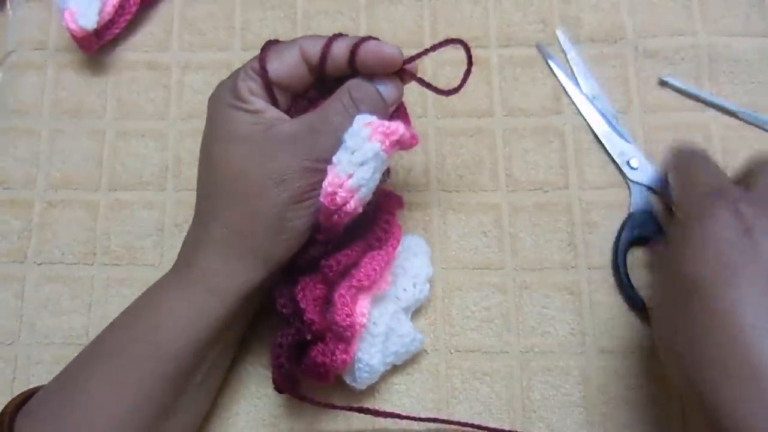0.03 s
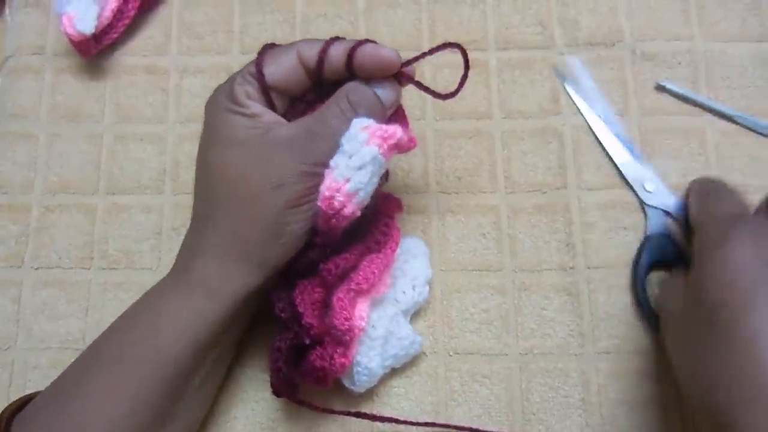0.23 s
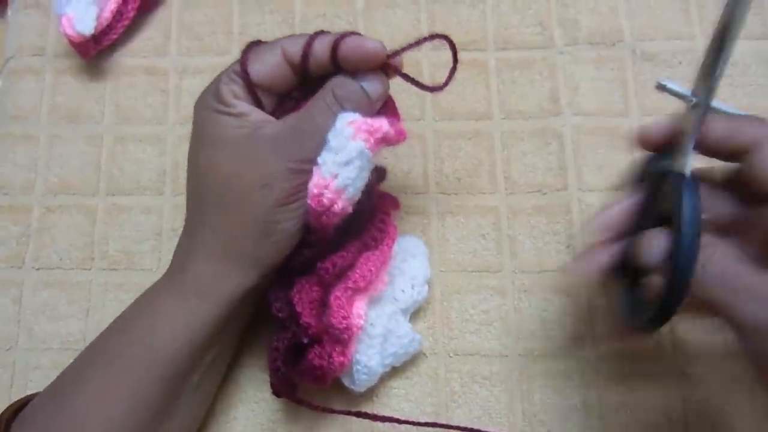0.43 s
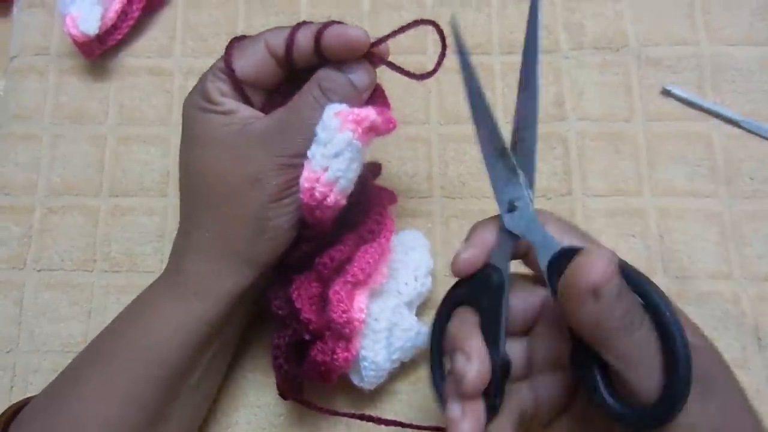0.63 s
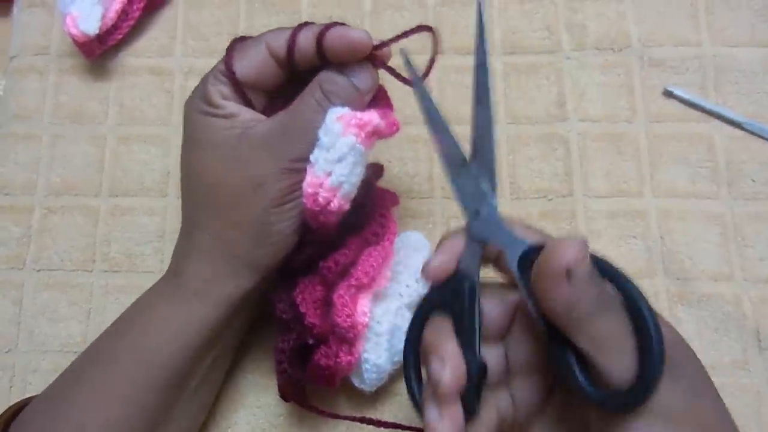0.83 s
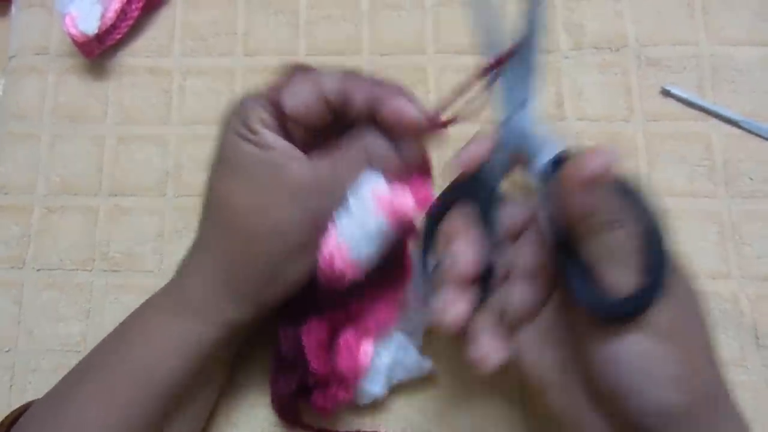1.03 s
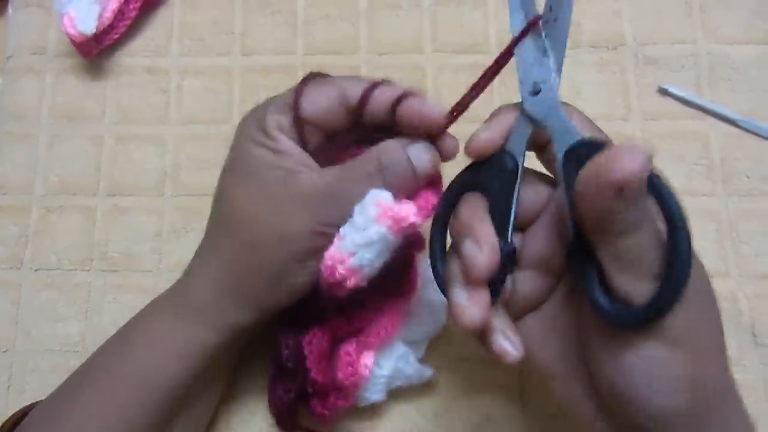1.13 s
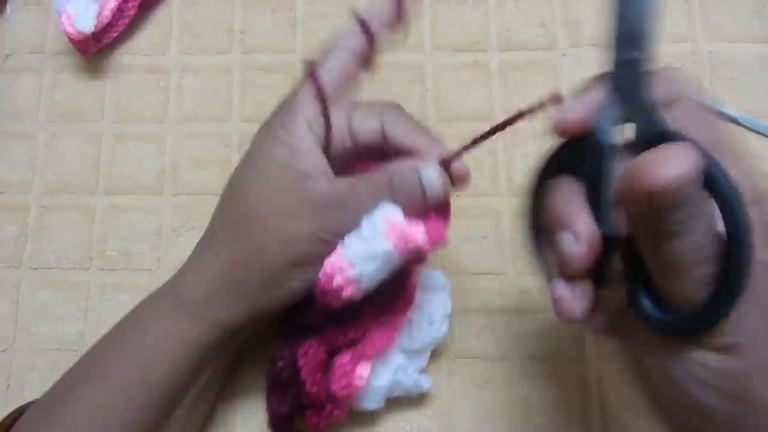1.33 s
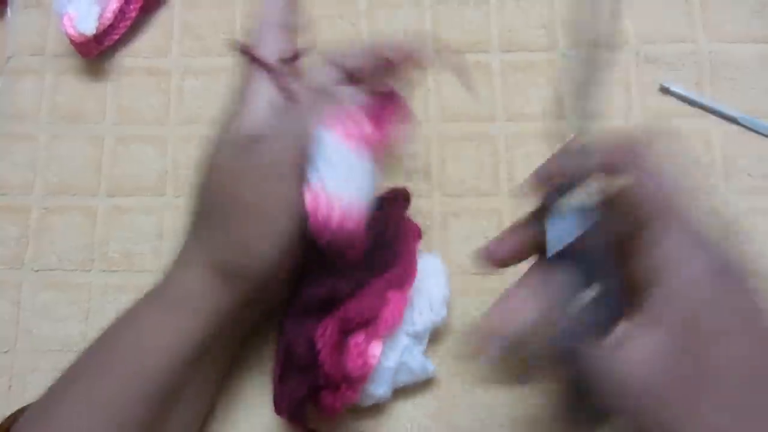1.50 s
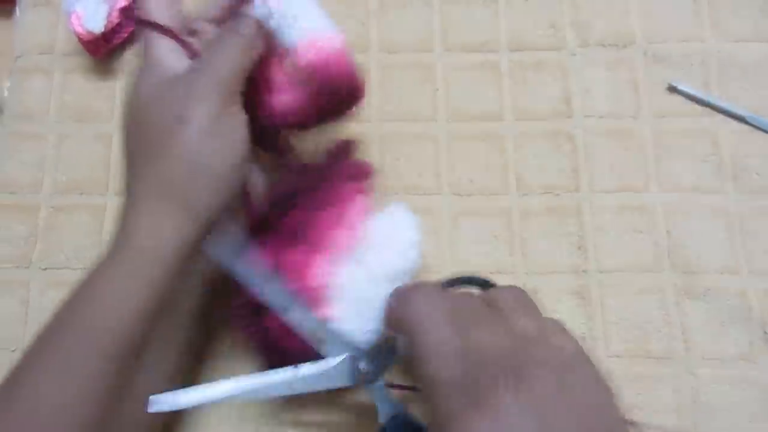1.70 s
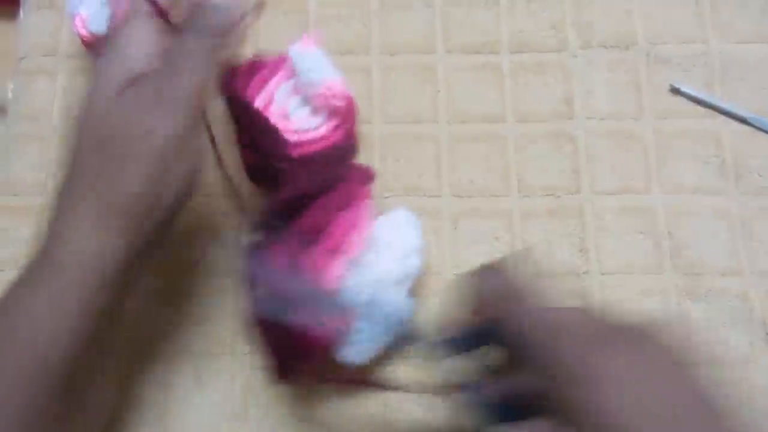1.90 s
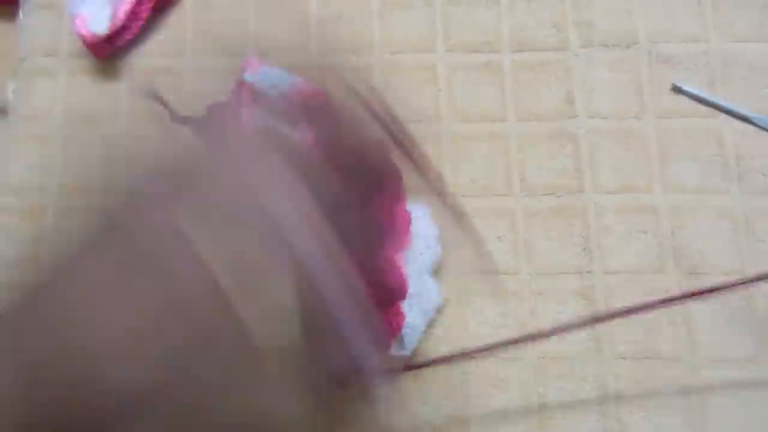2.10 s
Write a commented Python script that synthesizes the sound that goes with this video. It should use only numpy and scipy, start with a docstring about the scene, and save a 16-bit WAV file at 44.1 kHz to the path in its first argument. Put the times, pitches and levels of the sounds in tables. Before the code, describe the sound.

Scissors handled close to the microphone in a small quiet room: faint ticks, one loud steel clack, a lighter click, a short crisp snip through wool, then small ticks and soft table knocks over faint hum and hiss.

```python
"""Scissors are picked up and clack shut, then shear through a strand of wool and tick as they are put down.
Clicks ring a damped steel body and a faint free ring; rubs and cut wool are trains of tiny strikes.
Soft knocks of a handle or a hand ring short modes on the table, and a lifted blade sings faintly.
A small room answers with a short tail of sparse taps with its own decay in each band.
Shaped noise makes room hiss, low rumble and the rustle of hands and wool; a wavering sine makes the hum."""
import sys
import numpy as np
from scipy import signal
from scipy.io import wavfile

SR = 44100
rng = np.random.default_rng(int(sys.argv[2]) if len(sys.argv) > 2 else 0)


def to_wav(sig):
    """Store sig (one row per channel, or 1-D mono) as 16-bit WAV at the path in sys.argv[1].

    Samples outside -1..1 are clipped; the rate is SR.
    """
    pcm = np.clip(np.atleast_2d(sig), -1, 1) * 32767
    pcm = np.round(pcm).astype(np.int16)
    wavfile.write(sys.argv[1], SR, pcm.T)  # frames by channels


def natural_amplitude(level_db):
    """Convert a level in decibels to a linear amplitude factor, elementwise."""
    exponent = np.asarray(level_db, float) / 20
    return 10 ** exponent


N = 94815  # length in samples

# stereo image of the scissors, also used in part by the rustle: (frequency [Hz], left over right [dB])
PORTS = [(800, 0), (2000, -2), (3500, -6), (6000, -9.5), (8000, -17), (10000, 13), (11500, 4), (13000, 24),
         (15500, 19)]
# likeness of the two channels in hiss and rumble: (frequency [Hz], correlation [0 to 1])
LIKENESS = [(25, 0.51), (60, 0.98), (150, 0.647), (380, 0.33), (950, 0.36), (2400, 0.022), (15000, 0.034)]
# stereo balance of hiss and rumble: (frequency [Hz], left over right [dB])
BALANCE = [(60, -0.47), (180, -0.16), (550, 0.086), (1650, -0.83), (4970, -2.03), (15000, 0.22)]
BIN_HZ = np.fft.rfftfreq(1024, 1 / SR)  # the bins of the shaped noise


def unit_rms(x):
    """Scales a sound to an rms of 1."""
    return x / np.sqrt(np.mean(x ** 2) + 1e-20)


def read_curve(points, hz):
    """Reads a curve of (frequency, value) points along a log frequency axis."""
    f, value = np.transpose(points)
    return np.interp(np.log(hz + 1), np.log(f + 1), value)


def read_fader(points):
    """Draws straight lines through (time, level) points, one value per sample."""
    s, db = np.transpose(points)
    return np.interp(np.arange(N) / SR, s, db)


def left_right(db):
    """Splits a left-over-right difference in dB evenly between the two channels."""
    return np.array([[db], [-db]]) / 2


def add(mix, s, sound):
    """Lays a sound into the mix at a time in seconds, cut off at the end of the mix."""
    part = mix[:, round(s * SR):][:, :sound.shape[1]]
    part += sound[:, :part.shape[1]]


def slow_wander(top_hz):
    """A random wander of rms 1: sines from 0.4 Hz to top_hz, weaker as they get faster."""
    t = np.arange(N) / SR
    rates = np.geomspace(.4, top_hz, num=16)
    return unit_rms(sum(np.sin(2 * np.pi * (f * t + rng.random())) / np.sqrt(f) for f in rates))


def shaped_noise(level_db, likeness, lean_db):
    """Two-channel noise of rms 1 from random short-time spectra; the arguments are per bin."""
    a, b, c, d = rng.standard_normal((N // 256 + 5, 513, 4)).T
    likeness = np.clip(likeness, -1, 1)[:, None]
    left = a + 1j * b
    right = likeness * left + np.sqrt(1 - likeness ** 2) * (c + 1j * d)
    lean = lean_db[:, None] / 2
    spectra = np.array([left * natural_amplitude(lean), right * natural_amplitude(-lean)]) * natural_amplitude(level_db)[:, None]
    return unit_rms(signal.istft(spectra, nperseg=1024, noverlap=768)[1][:, :N])


def room_hiss():
    """Broadband noise whose level wanders slightly, with little left above its top edge."""
    # spectrum of the hiss: (frequency [Hz], relative density [dB])
    hiss_colour = [(12, -16), (60, -25), (98, -14), (176, -11.5), (300, -13.5), (600, -14.5), (850, -17),
                   (1200, -13.5), (1500, -18.5), (2100, -17), (6000, -20), (10000, -22), (13000, -20),
                   (15000, -23.5), (15700, -19.5)]
    level_db, waver_db, waver_top_hz, top_hz = -56.5, .5, 3.6, 15850
    colour = read_curve(hiss_colour, BIN_HZ) - 60 * (BIN_HZ > top_hz)
    hiss = shaped_noise(colour, read_curve(LIKENESS, BIN_HZ), read_curve(BALANCE, BIN_HZ))
    return natural_amplitude(level_db + waver_db * slow_wander(waver_top_hz)) * hiss


def low_rumble():
    """Low rumble of table and room: bass-heavy noise that swells and sinks."""
    # swell of the rumble: (time [s], level [dB])
    rumble_level = [(0, -79), (.2, -61), (.45, -68.5), (.8, -72), (1.15, -67.5), (1.45, -71), (1.8, -79.5),
                    (1.92, -71.5), (2.15, -67)]
    # spectrum of the rumble: (frequency [Hz], relative level [dB])
    rumble_colour = [(12, -8), (30, 8.5), (55, -3.5), (85, -16), (130, -27), (300, -69.5)]
    colour = read_curve(rumble_colour, BIN_HZ)
    rumble = shaped_noise(colour, read_curve(LIKENESS, BIN_HZ), read_curve(BALANCE, BIN_HZ))
    return natural_amplitude(read_fader(rumble_level)) * rumble


def hum():
    """A steady single tone that wavers slightly in level and pitch."""
    mean_hz, drift_hz = 233.45, 0.31  # drift is rms
    level_db, waver_db, lean_db = -62.5, 1.0, -0.7  # waver is rms, lean is left over right
    level = natural_amplitude(level_db + waver_db * slow_wander(15.0))
    cycles = np.cumsum(mean_hz + drift_hz * slow_wander(4.0)) / SR
    tone = level * np.sqrt(2) * np.sin(2 * np.pi * cycles)
    return tone * natural_amplitude(left_right(lean_db))


def rustle():
    """Hands and wool moving: wide noise with a restless level."""
    # movement of hands and wool: (time [s], level before the trim [dB])
    rustle_level = [(0.0, -56), (0.2, -49.5), (0.35, -54.5), (0.63, -72), (0.92, -69), (1.2, -61.5),
                    (1.51, -60.5), (1.81, -55.5), (1.96, -58), (2.15, -69)]
    # spectrum of the rustle: (frequency [Hz], relative level [dB])
    rustle_colour = [(1500, -15), (3500, -11), (6200, -7), (9000, -10), (14000, -11.5), (15600, -16),
                     (15900, -46)]
    trim_db, flutter_db, flutter_top_hz = -3, 0.5, 32.9
    level = natural_amplitude(trim_db + read_fader(rustle_level) + flutter_db * slow_wander(flutter_top_hz))
    lean_db = read_curve(PORTS, BIN_HZ) * .4
    return level * shaped_noise(read_curve(rustle_colour, BIN_HZ), 0.4 + 0 * BIN_HZ, lean_db)


def background():
    """Everything that lies under the scissors."""
    return room_hiss() + rustle() + low_rumble() + hum()


def room(x):
    """Reverberant tail: sparse random taps, each band dying at its own speed."""
    # decay of the room: (frequency [Hz], time to fall 60 dB [s])
    room_decay = [(800, .3), (2000, 0.54), (6000, 0.34), (11000, 0.083), (16000, 0.11)]
    side_db = 0.5  # left over right
    taps = np.zeros((2, SR // 2))
    # one tap in every 20 samples, from about 7 ms on
    at = np.arange(300, SR // 2 - 20, 20) + rng.integers(0, 20, (2, (SR // 2 - 301) // 20))
    np.put_along_axis(taps, at, rng.choice([-1., 1.], at.shape), 1)
    hz, t, spectra = signal.stft(taps, SR, nperseg=256)
    decay = natural_amplitude(-60 * t / read_curve(room_decay, hz)[:, None])
    tail = signal.istft(spectra * decay, SR, nperseg=256)[1]
    tail = tail / np.linalg.norm(tail[0]) * natural_amplitude(left_right(side_db))
    return signal.fftconvolve(x.mean(0)[None], tail, axes=1)[:, :N]


def ring_modes(modes, centre_hz, breadth, length):
    """Decaying modes excited around one part of the spectrum, as each microphone port hears them."""
    rise_s, detune_spread, lag_spread_s = 0.00017, 0.0153, .00001
    hz, db, t60 = np.transpose(modes)[:, :, None]
    t = np.arange(0, length, 1 / SR)
    # a mode lies 6 dB lower at one breadth (in octaves) from the centre
    db = db - 6 * (np.log2(hz / centre_hz) / max(breadth, .1)) ** 2
    # each strike detunes every mode at random, so repeated strikes blur the ring
    detune = 1 + detune_spread * rng.standard_normal(hz.shape)
    # small random time offset between left and right for each mode
    lag = lag_spread_s * rng.standard_normal(hz.shape)
    # a narrow strike is a slower one
    rise = np.sin(np.pi / 2 * np.minimum(t * np.clip(breadth, .1, 1) / rise_s, 1)) ** 2
    decay = natural_amplitude(db - 60 * t / t60)
    ports = []
    for side in (1, -1):  # left, right
        gain = 2 / (1 + natural_amplitude(-side * read_curve(PORTS, hz)))
        tones = np.sin(2 * np.pi * hz * (detune * t + side * lag))
        ports.append((gain * decay * tones).sum(0) * rise)
    return np.array(ports)


def unit_peak(sound):
    """Scales a two-channel sound so that its mono sum peaks at 1."""
    return sound / np.abs(sound.mean(0)).max()


def add_knocks(table):
    """Knocks of a handle or a hand on the table, ringing a few short modes."""
    # the knocks: (time [s], level [dB], centre [Hz], breadth [octaves])
    knocks = [(0.349, -34.5, 1300, 2.9), (1.935, -36.5, 340, 0.99), (1.958, -37.5, 340, 0.89)]
    # modes of handle and table: (nominal frequency [Hz], level [dB], time to fall 60 dB [s])
    handle_modes = [(1300, 2.5, 0.027), (340, -15.5, 0.06), (1900, -21.5, 0.0092)]
    for s, db, hz, breadth in knocks:
        add(table, s, natural_amplitude(db) * ring_modes(handle_modes, hz, breadth, .1))


def add_blade_ting(steel):
    """A lifted blade sings on, wavering: narrow-band noise that swells and dies."""
    # the ting: (start [s], length [s], frequency [Hz], width [Hz], level before the swell [dB])
    ting = (.51, .19, 2900, 150, -66)
    start, length, hz, width, db = ting
    t = np.arange(0, length, 1 / SR)
    r = np.exp(-np.pi * width / SR)
    white = rng.standard_normal(len(t)) + 1j * rng.standard_normal(len(t))
    slow_part = signal.lfilter([1], [1, -2 * r, r * r], white)
    whistle = unit_rms((slow_part * np.exp(2j * np.pi * hz * t)).real)
    swell = np.sqrt(np.sin(np.pi * np.sqrt(t / length)))
    add(steel, start, np.tile(natural_amplitude(db) * whistle * swell, (2, 1)))


def slip_train(length, db, strike):
    """Dense uneven slips of either sign, each a small strike, in a skewed swell."""
    slips_per_s, spread_db, skew = 3500, 3, 0.39
    u = np.arange(0, 1, 1 / (length * SR))
    swell = np.sqrt(np.sin(np.pi * u ** skew))
    out = 0
    for part in range(8):  # eight different strikes share the slips
        chance, size, sign = rng.random((len(u), 3)).T
        slips = (chance < slips_per_s / 8 / SR) * natural_amplitude(-spread_db * np.log(size)) * np.sign(sign - .5)
        out = out + signal.fftconvolve((slips * swell)[None], strike(), axes=1)
    return natural_amplitude(db) * out / np.sqrt(np.mean(out[:, :len(u)] ** 2) + 1e-20)


def fibre_snap():
    """One wool fibre parting on the open edge and ringing the blades, peak 1."""
    # what it rings in the open blades: (nominal frequency [Hz], level [dB], time to fall 60 dB [s])
    edge_modes = [(1300, -24.5, 0.016), (2390, -21, 0.0064), (3630, -13, 0.01), (5160, -11.5, .006),
                  (5700, -6, 0.0084), (6650, -12, 0.014), (7680, -16, 0.0087), (9260, -15, 0.0093),
                  (12240, -19, .006), (12900, -6.5, 0.0083), (13500, -1.5, 0.0082), (14560, -1.5, 0.0055)]
    return unit_peak(ring_modes(edge_modes, 8000, 20, .03))


def add_wool_cuts(steel):
    """Wool fibres snapping on the open edge, singly and in dense runs."""
    # single snaps: (time [s], level [dB])
    single_snaps = [(1.009, -38.5), (1.0335, -41.5), (1.0638, -40), (1.067, -37), (1.099, -44.5),
                    (1.1054, -35), (1.114, -48), (1.127, -48), (1.1369, -20.5), (1.1425, -18),
                    (1.1457, -22.5), (1.1484, -18), (1.1563, -47), (1.187, -45)]
    # runs of snaps: (start [s], length [s], level [dB])
    snap_runs = [(1.002, .012, -60), (1.095, .022, -58), (1.1325, .012, -34), (1.1415, .0125, -33),
                 (1.152, .06, -48)]
    for s, db in single_snaps:
        add(steel, s, natural_amplitude(db) * fibre_snap())
    for s, length, db in snap_runs:
        add(steel, s, slip_train(length, db, fibre_snap))


def scissors_strike(centre_hz, breadth):
    """One strike on the steel: the damped body and the faint free ring, peak 1."""
    # damped body of the held scissors: (nominal frequency [Hz], level [dB], time to fall 60 dB [s])
    body_modes = [(1350, -26, 0.0092), (1883, -2, 0.0075), (2480, -26, 0.0033), (3200, -15, 0.013),
                  (3820, -8, 0.0058), (4400, 1.5, 0.0038), (5720, -5, 0.011), (6300, 3, .006),
                  (7500, -17, 0.013), (9530, -8, 0.0055), (10150, -8, 0.0085), (11030, -1, 0.0071),
                  (13070, -2, 0.003), (13300, -6, 0.0058), (14230, -11, 0.0068)]
    # free ringing of the blades: (nominal frequency [Hz], level [dB], time to fall 60 dB [s])
    blade_modes = [(1830, -29, 0.11), (2000, -37, 0.11), (2516, -33, 0.2), (3720, -30, 0.1),
                   (4520, -72, 0.088), (5180, -25, .1), (5450, -45, 0.076), (5870, -37, .07),
                   (6080, -18.5, 0.033), (6300, -46, 0.052), (6800, -37, 0.16), (7535, -40, 0.25)]
    sound = ring_modes(blade_modes, centre_hz, breadth, .4)
    add(sound, 0, ring_modes(body_modes, centre_hz, breadth, .03))
    return unit_peak(sound)


def add_steel_trains(steel):
    """Dense trains of tiny steel strikes: blade rubs, a squeak, a narrow ring, diffuse tails, faint rustle."""
    # the trains: (start [s], length [s], level [dB], centre [Hz], breadth [octaves])
    steel_trains = [(0.053, 0.043, -61.5, 6600, 1.32), (.203, 0.014, -36.5, 10940, 0.75),
                    (0.216, 0.077, -51.5, 3840, 0.95), (0.224, 0.1, -49, 6200, 0.88),
                    (.470, 0.012, -42, 12000, 1.63), (0.4704, 0.0051, -38, 5700, .1),
                    (.480, 0.038, -54.5, 1900, 0.16), (0.5, 0.03, -46.5, 7500, 3.1),
                    (1.302, 0.076, -64.5, 3400, 0.26), (1.604, 0.0079, -53, 5450, 0.93)]
    for s, length, db, hz, breadth in steel_trains:
        add(steel, s, slip_train(length, db, lambda: scissors_strike(hz, breadth)))


def add_blade_clicks(steel):
    """Blade clicks: single strikes on the steel, each with its own place in the stereo image."""
    # the clicks: (time [s], level [dB], strike centre [Hz], breadth [octaves], left over right [dB])
    clicks = [(0.1168, -33.5, 4200, 0.5, -7), (0.1163, -31.5, 9000, 0.44, -3), (0.136, -40, 6000, 1.8, -6),
              (0.2067, -14.5, 11000, 2, 12.5), (0.2085, -19, 12000, 0.69, 0),
              (0.2113, -3.5, 4680, 3.5, -3.5), (0.2182, -29.5, 7000, 1.3, 6), (0.2275, -42, 4000, 2, -2),
              (0.2324, -38, 5000, 1.6, -8), (0.2532, -37.5, 6300, 0.44, -11.5),
              (0.47, -33, 5700, 0.085, 3.5), (0.4726, -45, 14560, 0.21, 0), (0.479, -23.5, 14100, 0.27, 6),
              (0.4797, -17.5, 6300, 1.12, 1), (0.4784, -30, 4400, 0.18, 3), (0.487, -35, 5500, 0.12, 1.5),
              (0.4935, -37, 5800, 0.11, -5), (0.5014, -31, 2220, 1.9, 7), (0.5051, -42, 5660, 1, 2),
              (0.5122, -38.5, 10200, 0.396, 2), (1.1478, -24.5, 4200, 0.65, -2),
              (1.381, -32.5, 10650, 0.74, 2), (1.3821, -32, 4630, 0.68, 0), (1.383, -33.5, 9800, 0.098, 1),
              (1.399, -34, 7500, 1.37, 2), (1.4016, -43.5, 3500, 0.47, -4), (1.6032, -34.5, 4420, 0.4, 7),
              (1.6027, -40.5, 9000, 0.87, 5)]
    for s, db, hz, breadth, pan_db in clicks:
        add(steel, s, natural_amplitude(db + left_right(pan_db)) * scissors_strike(hz, breadth))


def scene():
    """Scissors and table knocks, their room tail, and the background."""
    thin_hz, room_db = 916, -18
    steel, table = np.zeros((2, 2, N))
    add_knocks(table)
    add_blade_ting(steel)
    add_wool_cuts(steel)
    add_steel_trains(steel)
    add_blade_clicks(steel)
    # small steel radiates little bass
    thin = signal.butter(6, thin_hz, "high", fs=SR, output="sos")
    near = table + signal.sosfilt(thin, steel)
    return near + natural_amplitude(room_db) * room(near) + background()


def top_cut(x):
    """Nothing passes above the cut-off."""
    return signal.sosfilt(signal.butter(12, 16800, fs=SR, output="sos"), x)


def record(dry):
    """Limits the band with a steep low-pass and finishes the mix."""
    low_pass = signal.firwin(301, 16300, window=("kaiser", 7), fs=SR)  # edge in Hz
    mix = signal.oaconvolve(dry, low_pass[None], "same")
    return top_cut(mix)


dry = scene()
out = record(dry)
to_wav(out)
```